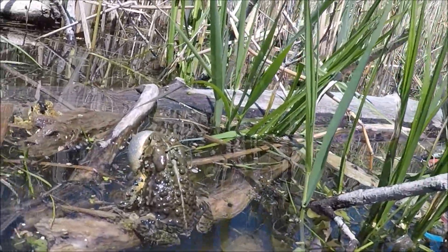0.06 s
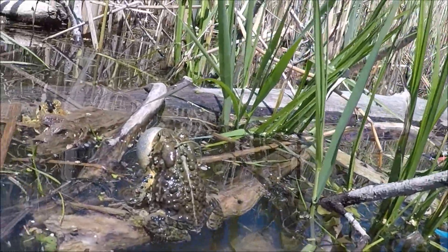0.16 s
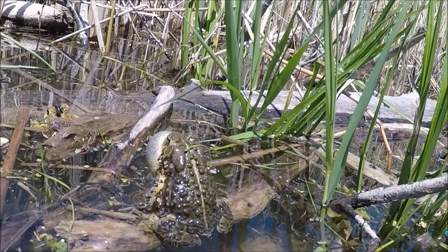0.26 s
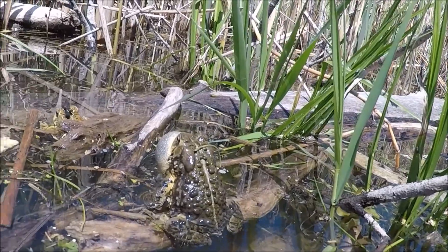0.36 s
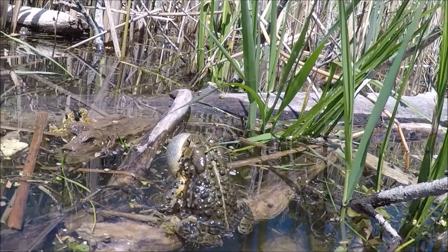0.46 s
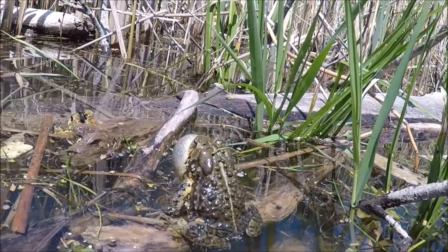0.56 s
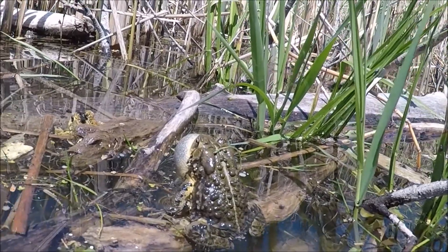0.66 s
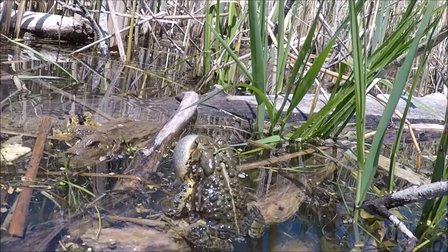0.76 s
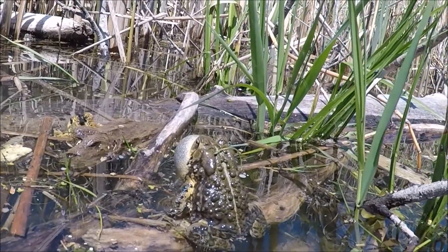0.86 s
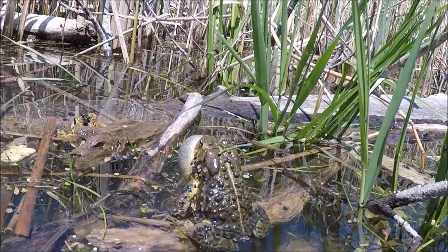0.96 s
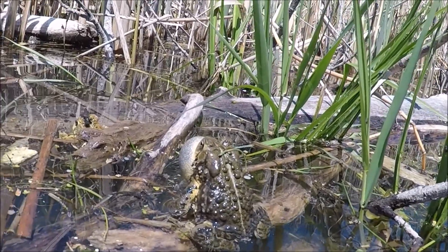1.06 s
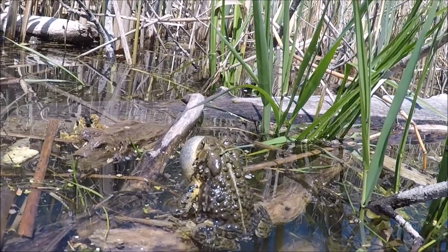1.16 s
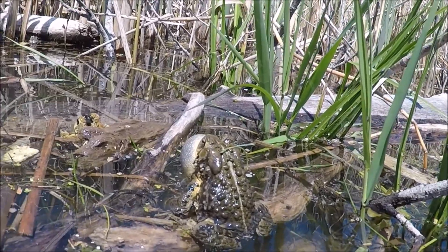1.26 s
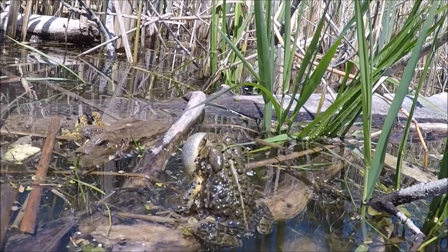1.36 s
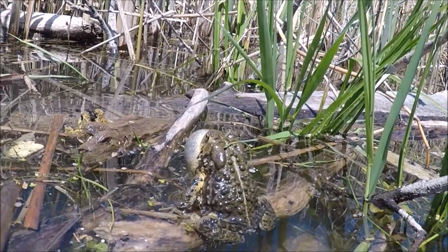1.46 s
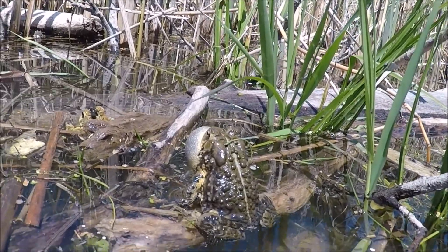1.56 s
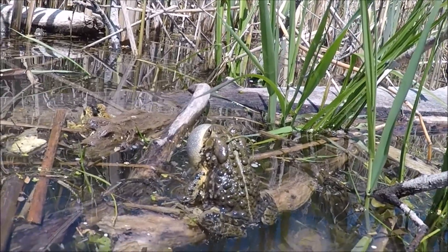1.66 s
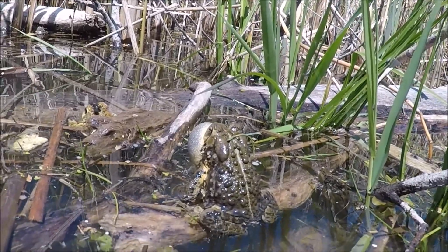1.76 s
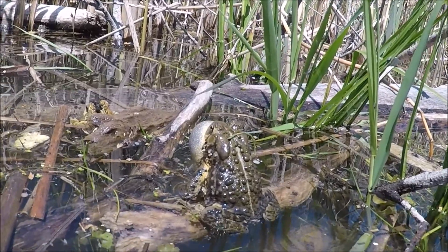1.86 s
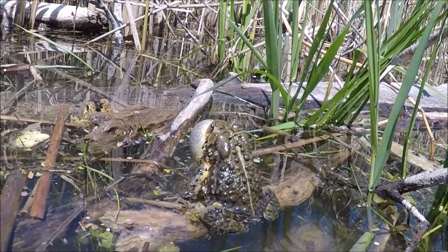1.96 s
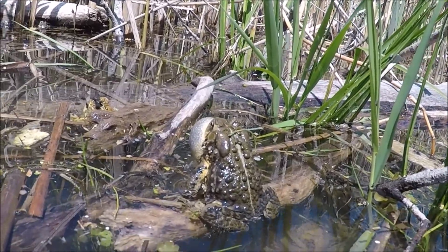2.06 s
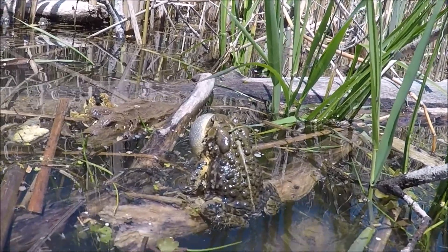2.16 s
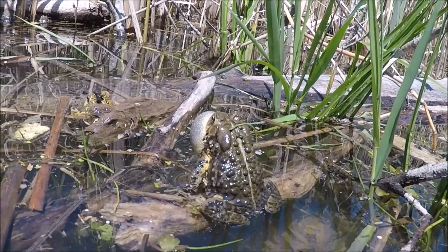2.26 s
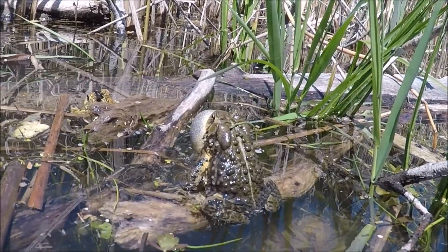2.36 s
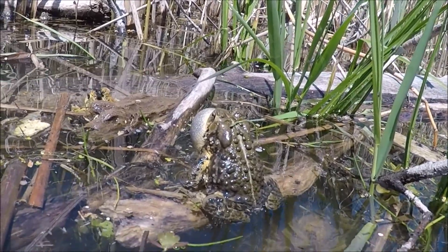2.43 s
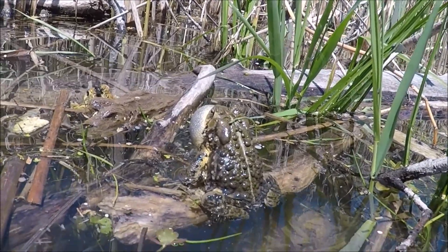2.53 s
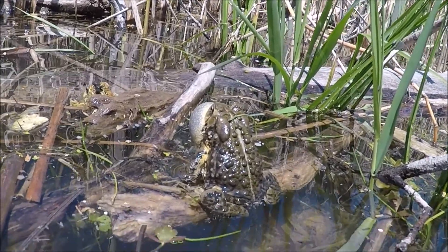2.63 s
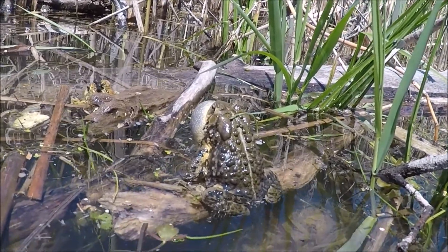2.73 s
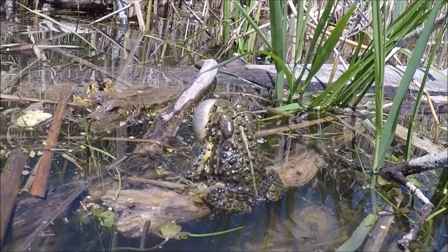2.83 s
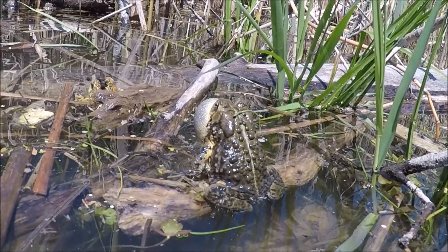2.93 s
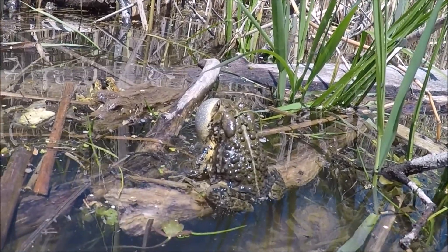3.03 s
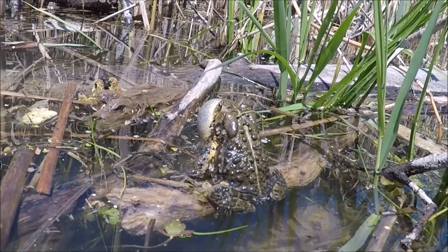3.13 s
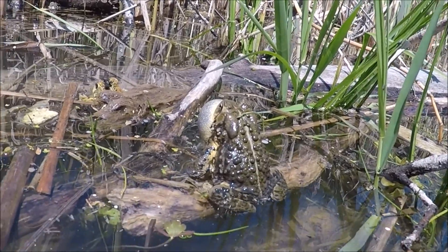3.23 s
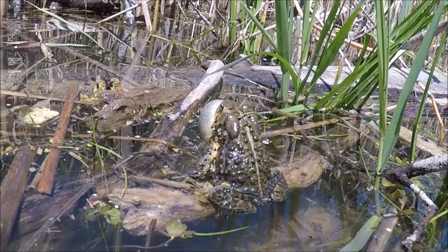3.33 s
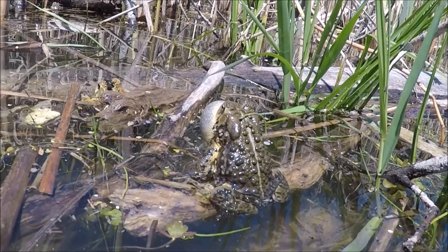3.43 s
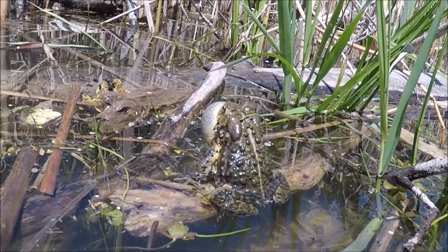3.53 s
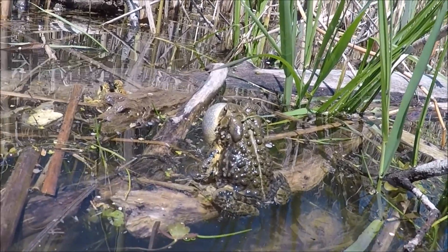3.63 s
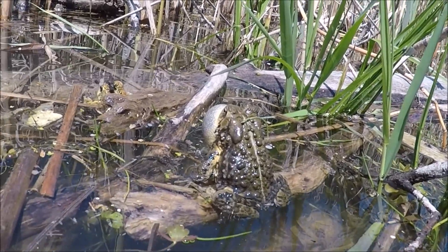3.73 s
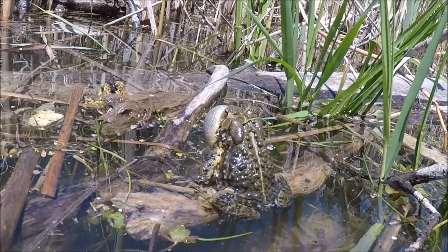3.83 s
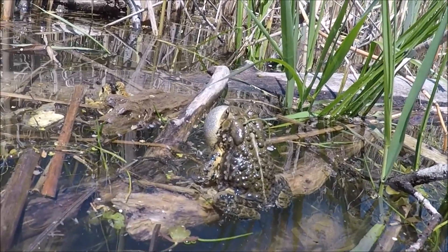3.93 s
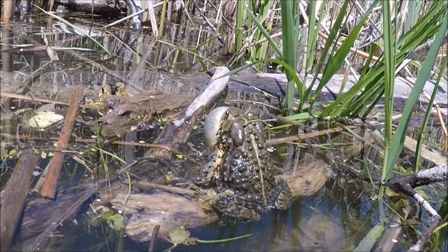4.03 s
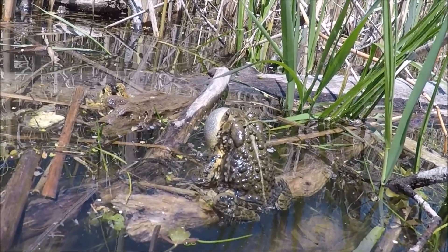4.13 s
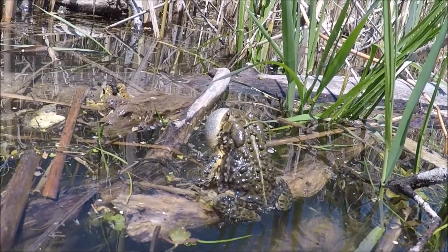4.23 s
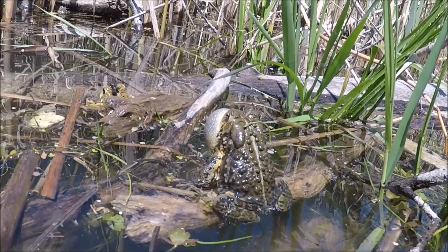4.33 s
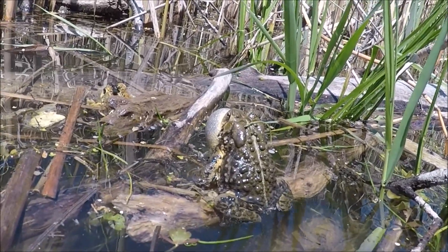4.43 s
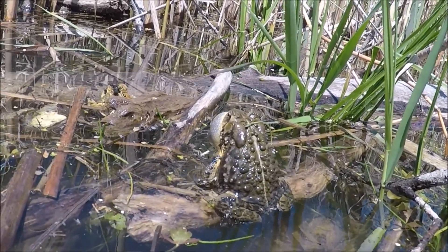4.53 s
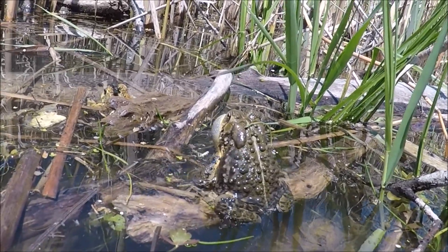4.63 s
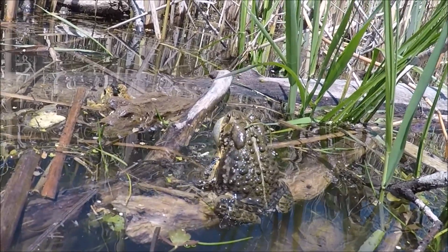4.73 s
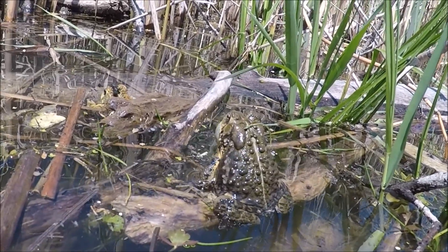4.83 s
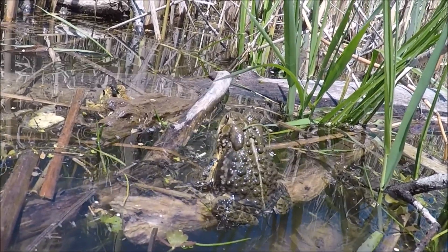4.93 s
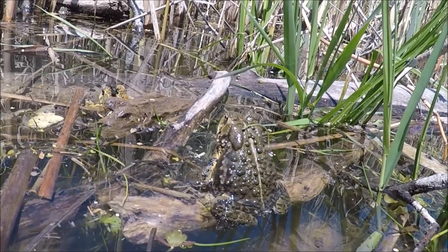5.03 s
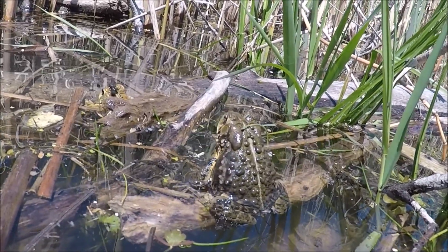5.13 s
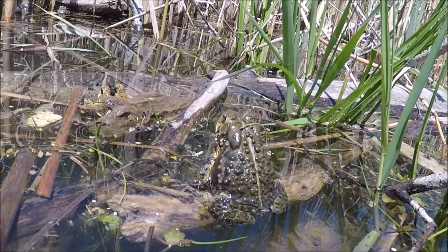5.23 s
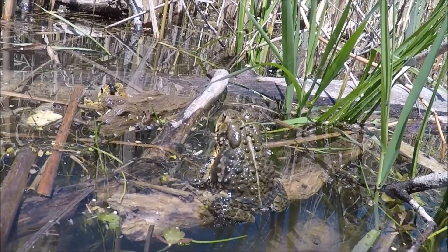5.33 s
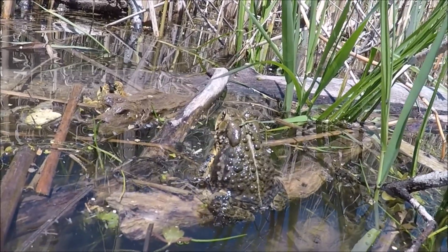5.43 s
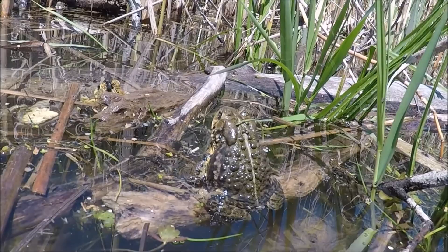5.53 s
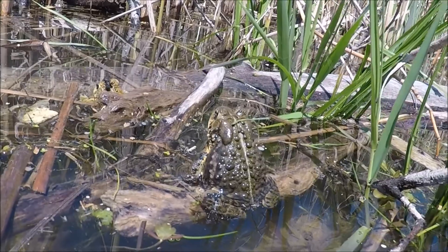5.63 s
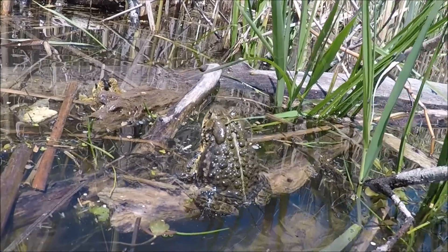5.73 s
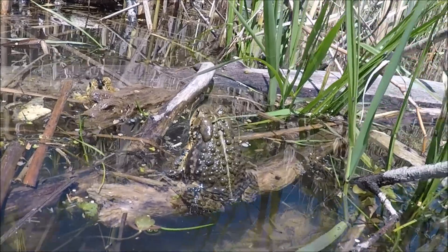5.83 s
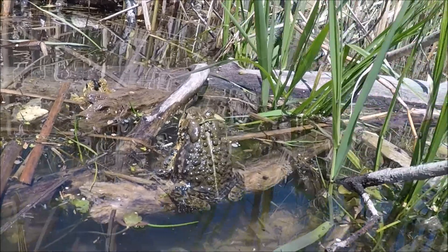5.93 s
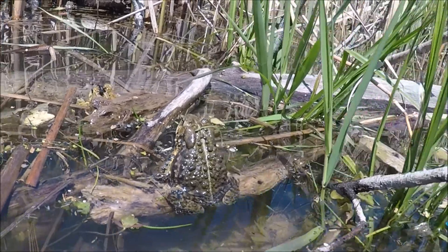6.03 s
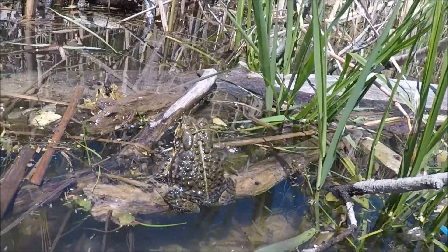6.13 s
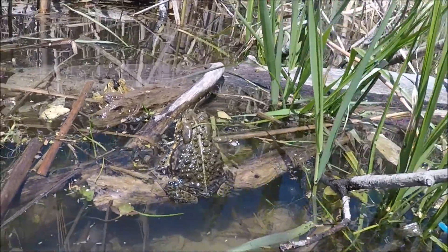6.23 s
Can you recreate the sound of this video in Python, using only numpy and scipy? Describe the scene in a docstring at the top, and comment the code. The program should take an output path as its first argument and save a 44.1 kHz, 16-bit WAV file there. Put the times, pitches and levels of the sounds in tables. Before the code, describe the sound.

One nearby toad trills loudly and steadily outdoors by the water, nearly covering the others among the reeds. It cuts off about two thirds of the way through, leaving a quieter chorus of toads whose trills drift in and out of step. Light wind rumbles on the handheld microphone, with low knocks that are strongest at the beginning, and dry reeds tick and swish faintly toward the end.

```python
"""Toads at the pond's edge

A toad trills close by, pushing puffs of air past its vocal cords into a ringing throat sac, then stops;
three more trill on among the reeds. Wind and a hand bump the microphone, a distant engine drones,
dry reeds tick, a leaf swishes along a stem and something peeps across the pond.
The camera's gain control holds the near toad down and lets the rest swell up once it is silent."""
import sys
import numpy as np
from scipy import signal
from scipy.fft import rfft, irfft, next_fast_len
from scipy.io import wavfile
from scipy.ndimage import uniform_filter1d, minimum_filter1d, map_coordinates

SR = 44100
rng = np.random.default_rng(int(sys.argv[2]) if len(sys.argv) > 2 else 0)


def put_to_file(sound):
    """Save the sound as 16-bit audio at rate SR, in the file named by the first command-line argument."""
    columns = np.atleast_2d(sound).T  # one column per channel
    safe = np.clip(columns, -1, 1)
    whole_steps = np.round(safe * 32767)
    wavfile.write(sys.argv[1], SR, whole_steps.astype(np.int16))


N = 276948

# the colour of dry reed, rubbed or snapped: (frequency [Hz], relative level [dB])
REED_SPECTRUM = [(2000, -38.5), (3000, -3), (5300, -12), (6700, -6), (8000, -8), (10000, -19.5),
                 (12500, -19.5), (14000, -35.5)]


def amp(db):
    """Decibels to gain."""
    return 10 ** (np.asarray(db) / 20)


def unit(x):
    """Scale to rms 1."""
    return x / np.sqrt(np.mean(x ** 2) + 1e-20)


def clock():
    """Seconds at each sample."""
    return np.arange(N) / SR


def curves(rows, at):
    """Each column after the first, read at the given places along the first."""
    first, *columns = np.transpose(rows)
    return [np.interp(at, first, column) for column in columns]


def wobble(rate):
    """A smooth random curve, rate knots a second."""
    return map_coordinates(rng.standard_normal(int(N * rate / SR) + 4), [clock() * rate])


def filtered(x, response):
    """x shaped by a complex response of frequency."""
    size = next_fast_len(N + SR // 2)
    return irfft(rfft(x, size) * response(np.fft.rfftfreq(size, 1 / SR)), size)[..., :N]


def noise(spectrum):
    """Stereo noise of rms 1, coloured by (frequency [Hz], level [dB]) points."""
    points_hz, db = np.transpose(spectrum)
    white = rng.standard_normal((2, N))
    return unit(filtered(white, lambda hz: amp(np.interp(np.log(hz + 1), np.log(points_hz), db))))


def resonance(x, centre_hz, width_hz):
    """One ringing mode with gain 1 at its centre."""
    return filtered(x, lambda f: 1j * f * width_hz / (centre_hz ** 2 - f * f + 1j * f * width_hz))


def delayed(x, ms):
    """x arriving some milliseconds later."""
    return filtered(x, lambda hz: np.exp(-2j * np.pi * hz * ms / 1000))


def wind():
    """The breeze buffets the microphone in lumps, harder at the right port."""
    # the breeze eases, then picks up again: (time [s], level [dB])
    breeze = [(0, -17), (1.1, -26), (1.55, -22), (2.2, -26), (4.25, -27), (4.75, -33.5), (5.2, -27),
              (6.28, -22.5)]
    # the colour of the buffeting: (frequency [Hz], relative level [dB])
    rumble = [(13, -24), (22, 9.5), (54, 0), (91, -2.5), (140, -6.5), (177, -12.5), (202, -14.5),
              (339, -23), (398, -29.5), (700, -43), (910, -58.5), (1540, -120)]
    level_db, = curves(breeze, clock())
    lumps = amp(1.2 * wobble(10) + 2 * np.array([wobble(25), wobble(25)]))
    return amp(level_db) * amp([[0], [3.5]]) * unit(lumps * noise(rumble))


def engine():
    """A distant engine drones on three wavering harmonics of its firing rate."""
    # the drone recedes, then returns a little: (time [s], fundamental [dB], octave [dB])
    drone = [(0, -18.5, -36.5), (2.4, -32.5, -31.5), (3.5, -33, -39), (6.28, -28, -36.5)]
    firing_hz, third_db = 85.7, -48
    levels_db = [*curves(drone, clock()), third_db]
    phase = 2 * np.pi * firing_hz * np.cumsum(1 + .012 * wobble(5)) / SR
    return sum(amp(db + 2.4 * wobble(4.7)) * np.sin(k * phase) for k, db in enumerate(levels_db, 1))


def hush():
    """A steady bed of outdoor air."""
    # the colour of the air: (frequency [Hz], relative level [dB])
    air = [(200, 13.5), (600, -4.5), (1200, 10), (2400, -7.5), (3900, -13.5), (5000, -14), (7000, -17.5),
           (10000, -23), (11500, -28.5), (13300, -36.5)]
    return amp(-38.5) * noise(air)


def trill(rate, anchor_s, pitch_hz, puff, overtones, puff_s, scatter_db, jitter_s, bright=0, end=np.inf):
    """Puffs of air, one due at anchor_s; in each the vocal cords swell, arch in pitch and stall."""
    t = clock()
    beats = np.cumsum(rate) / SR
    beats -= np.interp(anchor_s, t, beats)
    number = np.floor(beats - np.floor(beats[0])).astype(int)
    stretch, detune, force, lag = rng.standard_normal((number[-1] + 1, 4))[number].T  # drawn per puff
    age = beats % 1 / rate - jitter_s * np.abs(2 + lag)  # each puff comes a little behind the beat
    progress = age / (puff_s * (1 + 0.024 * stretch))
    pitch_ratio, opening_db = curves(puff, progress)
    flutter = 1 + 0.0018 * detune + 0.0084 * wobble(900)  # uneven cycles make the overtones rasp
    cycles = np.cumsum(pitch_hz * pitch_ratio * flutter) / SR
    phase = 2 * np.pi * (cycles - np.interp(t - age, t, cycles))  # the cords start afresh in every puff
    edges = np.clip(np.minimum(progress, 1 - progress) / 0.017, 0, 1)
    gate = np.sin(np.pi / 2 * edges) ** 2 * (t - age < end)
    upper = sum(amp(db + bright * (k - 2) * opening_db) * np.sin(k * phase) for k, db in overtones)
    return gate * amp(scatter_db * force) * (amp(opening_db) * np.sin(phase) + upper)


def small_body(x, corner_hz):
    """A small animal radiates almost nothing below its corner frequency."""
    return filtered(x, lambda hz: 1 - 1 / (1 + (hz / corner_hz) ** 10))


def reed_scatter(x, t60, centre_hz, width_hz):
    """The stems scatter one band of a sound into a tail, different on each side and scaled to rms 1."""
    t = np.arange(SR // 2) / SR
    tail = rng.standard_normal((2, len(t))) * amp(-60 * t / t60) * (t > .004)
    wet = signal.fftconvolve(x[None], tail, axes=1)[:, :N]
    return np.array([unit(side) for side in resonance(wet, centre_hz, width_hz)])


def near_toad():
    """The throat sac rings with each puff and beams it left; a log echoes it, the stems scatter it."""
    # the trill slows as the toad tires: (time [s], rate [puffs/s])
    pace = [(0.0, 51.14), (0.62, 49.77), (2.61, 49.63), (3.91, 46.8), (4.02, 48.22), (4.3, 45.81),
            (4.44, 41.16)]
    # one puff through the larynx: (progress [0-1], pitch [ratio], opening [dB])
    puff = [(0, 0.74, -9), (.08, 0.92, -4), (.16, 1.047, -4), (.418, 1, 0.88), (.68, 0.971, -2.16),
            (0.881, 0.947, -8.5), (0.999, 0.76, -17)]
    # overtones of the vocal cords: (harmonic [number], level [dB])
    overtones = [(2, -29.5), (3, -34.5), (4, -38.5), (5, -49.5), (6, -53.5), (7, -52.5)]
    rate, = curves(pace, clock())
    cords = trill(rate, anchor_s=.0185, pitch_hz=1590.4, puff=puff, overtones=overtones,
                  puff_s=.0101, scatter_db=.25, jitter_s=.0001, bright=0.58, end=4.445)
    cords = small_body(cords, corner_hz=725)
    sac = resonance(cords, centre_hz=1630, width_hz=215)
    left = amp(-8.5) * cords + amp(7.0) * sac
    right = amp(-3.5) * delayed(cords, ms=0.044) + amp(-9) * sac
    log_echo = amp([[-22.5], [-21]]) * delayed(left, ms=4.47)
    treble = resonance(cords, centre_hz=7150, width_hz=350)
    sheen = amp(-57) * reed_scatter(treble, t60=.05, centre_hz=7200, width_hz=600)
    haze = amp(-33) * reed_scatter(cords, t60=0.022, centre_hz=3700, width_hz=1500)
    return np.array([left, right]) + log_echo + sheen + haze


def far_toads():
    """A high and a low toad drift in and out of step; a third is heard only through the reeds."""
    # how fast they trill: (time [s], high toad [puffs/s], low toad [puffs/s])
    pace = [(4.5, 55.73, 58.55), (4.75, 56.37, 60.22), (5, 55.66, 57.62), (5.25, 55.13, 56.16),
            (5.5, 56.08, 55.17), (5.75, 55.29, 54.61), (6, 55, 53.52), (6.28, 55.97, 54.45)]
    # how hard they call: (time [s], high toad [dB], low toad [dB])
    effort = [(0, -24, -24), (4.5, -17, -16), (4.8, -13, -17), (5.3, -14, -17.5), (5.8, -13, -15.5),
              (6.28, -14.5, -18.5)]
    # one puff through the larynx: (progress [0-1], pitch [ratio], opening [dB])
    puff = [(0, 0.56, -19), (.2, 0.94, 0), (.4, 0.97, 6.5), (.55, 0.99, 6.5), (.75, 1, -2),
            (1, 0.46, -20.5)]
    # the cords' faint octave: (harmonic [number], level [dB])
    overtones = [(2, -27)]
    high_rate, low_rate = curves(pace, clock())
    high_db, low_db = curves(effort, clock())
    voice = dict(puff=puff, overtones=overtones, puff_s=.0112, scatter_db=.9)
    high = amp(high_db) * trill(high_rate, anchor_s=4.5092, pitch_hz=1814.5, jitter_s=.0001, **voice)
    low = amp(low_db) * trill(low_rate, anchor_s=4.5109, pitch_hz=1590, jitter_s=.00015, **voice)
    third = trill(52.5 + wobble(2), anchor_s=0, pitch_hz=1717, jitter_s=.00015, **voice)
    left = amp(-1.4) * (high + low)
    right = amp(-11.5) * delayed(high, ms=0.19) + amp(-13.5) * delayed(low, ms=0.28)
    wash = amp(-30.5) * reed_scatter(high + low, t60=0.93, centre_hz=1710, width_hz=3500)
    hidden = amp([[-29], [-34]]) * reed_scatter(third, t60=0.052, centre_hz=3130, width_hz=2800)
    return small_body(np.array([left, right]) + wash + hidden, corner_hz=825)


def hand_bumps():
    """Each bump rocks the camera body for a cycle or two; the two ports move against each other."""
    # handling thumps: (time [s], level [dB], pitch [Hz], left port relative to right [dB])
    thumps = [(0.0302, 14.5, 167, -14.5), (0.1019, 12, 164.7, -7.5), (0.365, 14.5, 123, -9),
              (0.494, -1, 85, -2.5), (2.372, 2, 92.16, 9.5), (3.976, 2, 110, -10), (4.334, 4, 111.9, -8.5),
              (5.362, -13, 100, -13), (5.9166, 3.5, 89.72, -12), (5.9195, -4, 460.4, 1.5),
              (6.036, -6.5, 79.96, 8.5), (6.134, 2.5, 94.8, -7.5), (6.262, -2.5, 74.2, 2)]
    ring_cycles = 5.1  # to die away by 60 dB
    left, right = np.zeros((2, N))
    for start, db, hz, left_db in thumps:
        cycles = hz * np.maximum(clock() - start, 0)
        onset = 1 - np.exp(-(cycles / 0.22) ** 2)  # the deeper the bump, the softer its start
        push = amp(db - 60 * cycles / ring_cycles) * np.sin(2 * np.pi * cycles) * onset
        left += amp(left_db) * push
        right -= push
    return np.array([delayed(left, ms=0.31), right])


def reed_ticks():
    """Dry reeds snap in tiny bursts of bright noise."""
    # the snaps, ahead of the band filter: (time [s], level [dB])
    snaps = [(0.077, -25), (5.569, -35.5), (5.92, -30), (6.271, -36)]
    t, t60 = clock(), 0.015
    bursts = sum(amp(db - 60 * np.abs(t - start) / t60) * (t > start) for start, db in snaps)
    return resonance(bursts * noise(REED_SPECTRUM), centre_hz=6100, width_hz=2500)


def leaf_stroke(start, length, db):
    """A leaf catches, rubs with a squeak that starts high and settles, and lets go."""
    rise_db_per_s, fall_db_per_s, settle_s = 556, 257.5, 0.054
    age = clock() - start
    fade_db = rise_db_per_s * np.maximum(-age, 0) + fall_db_per_s * np.maximum(age - length, 0)
    squeak_hz = 6300 + 970 * np.exp(-np.maximum(age, 0) / settle_s)
    squeak = wobble(610) * np.sin(2 * np.pi * np.cumsum(squeak_hz) / SR)
    return amp(db - fade_db + 1.5 * wobble(90)) * (noise(REED_SPECTRUM) + amp(-3.5) * squeak)


def leaf_swish():
    """A reed leaf slides along a stem, off to the right."""
    # a short stroke, then a longer one: (time [s], length [s], level [dB])
    strokes = [(5.508, 0.025, -57), (5.685, .165, -49)]
    return amp([[-4], [2]]) * sum(leaf_stroke(*row) for row in strokes)


def peep():
    """One short, falling, unsteady note from across the pond."""
    middle_s, length_s = 5.722, 0.033
    middle_hz, fall_hz_per_s = 2970, 4800
    t = clock() - middle_s
    glide_hz = middle_hz - fall_hz_per_s * np.clip(t, -length_s, length_s)
    phase = 2 * np.pi * np.cumsum(glide_hz * (1 + 0.044 * wobble(640))) / SR
    swell = np.exp(-(2 * t / length_s) ** 2)
    return amp(-36.5) * swell * np.sin(phase)


def scene():
    """Everything that reaches the microphone's two ports."""
    toads = near_toad() + far_toads()
    return toads + hand_bumps() + wind() + engine() + leaf_swish() + hush() + reed_ticks() + peep()


def gain_control(x, ceiling_db, release_s):
    """The gain drops at once under a loud sound and creeps back afterwards; bass does not trip it."""
    sidechain = filtered(x, lambda hz: hz > 500)
    power = np.abs(uniform_filter1d(np.mean(sidechain ** 2, axis=0), size=220)) + 1e-12
    excess_db = np.maximum(10 * np.log10(power) - ceiling_db, 0)
    held_db = -minimum_filter1d(-excess_db, size=1800, origin=600)  # the hold bridges the puffs
    release = np.exp(-clock() / release_s)
    cut_db = np.maximum.accumulate(held_db / release) * release
    return x * amp(-uniform_filter1d(cut_db, size=200))


def record(dry):
    """The camera's gain control, soft overload and band limit."""
    clip_level, top_hz = .75, 13500
    levelled = gain_control(dry, ceiling_db=-11.0, release_s=0.55)
    rounded = levelled / (1 + (levelled / clip_level) ** 10) ** .1
    return filtered(rounded, lambda hz: hz < top_hz)


dry = scene()
out = record(dry)
put_to_file(out)
```